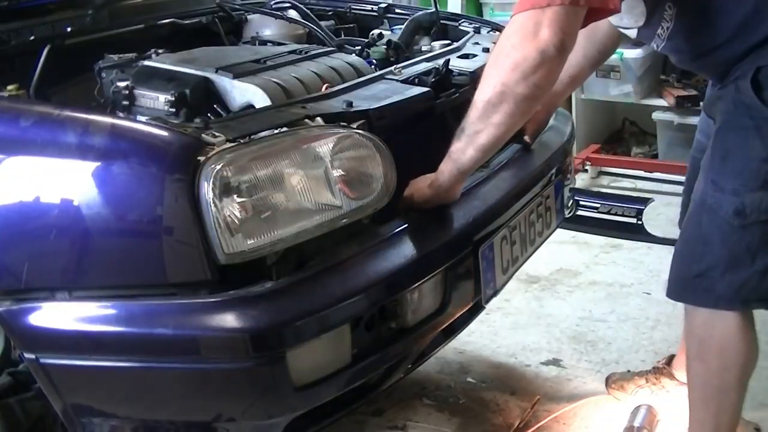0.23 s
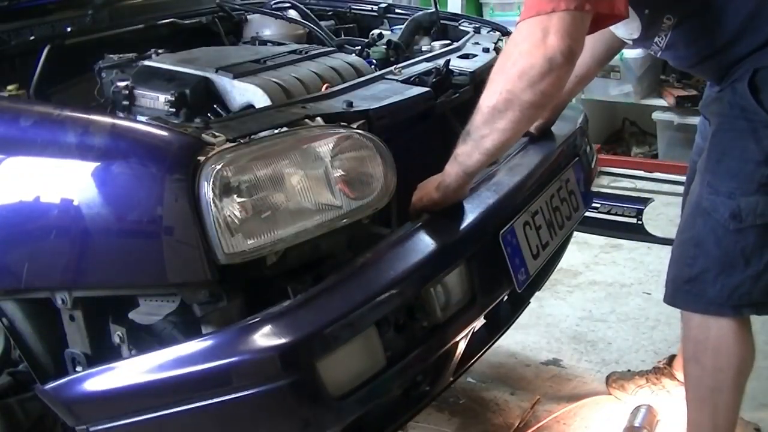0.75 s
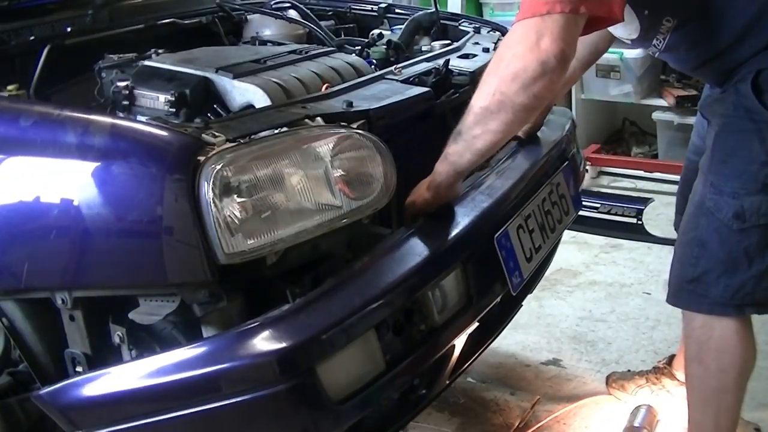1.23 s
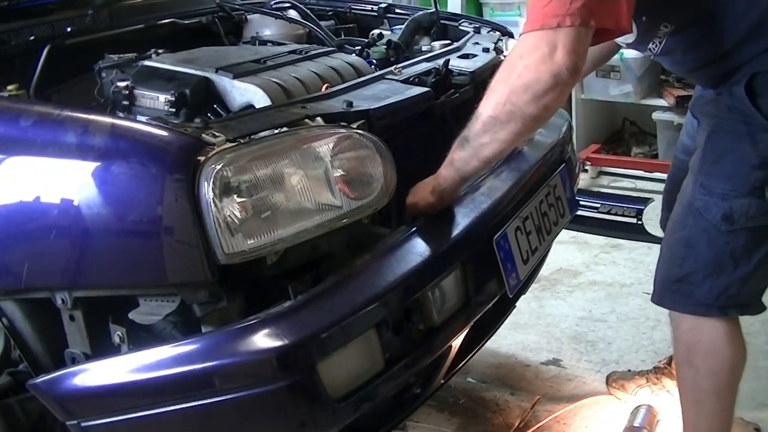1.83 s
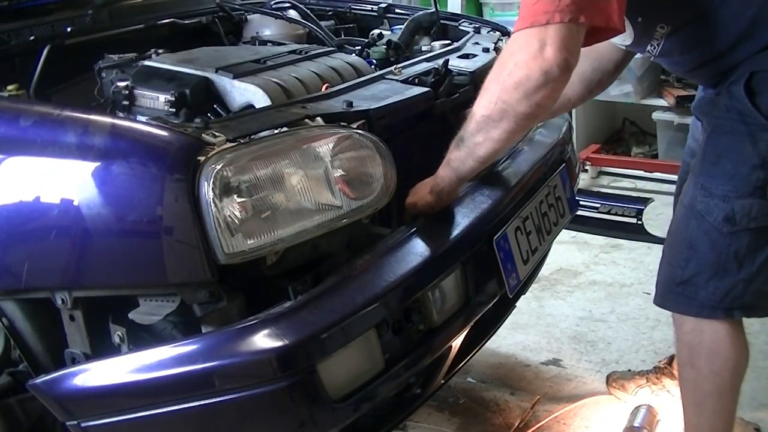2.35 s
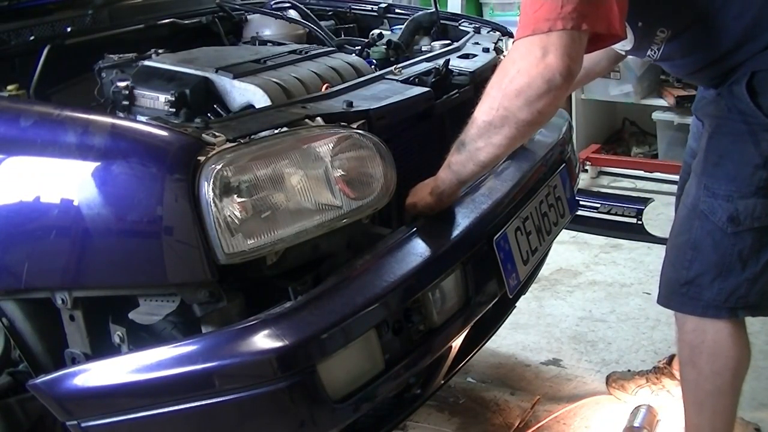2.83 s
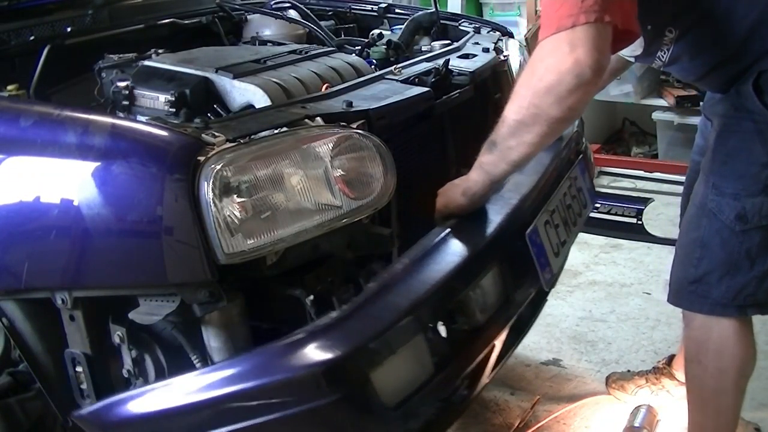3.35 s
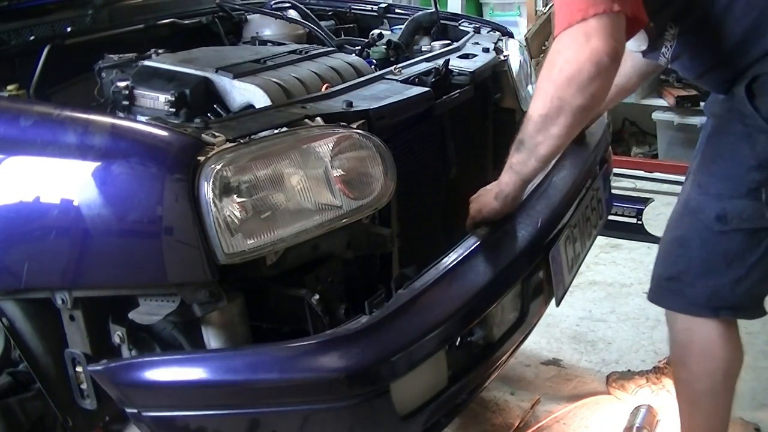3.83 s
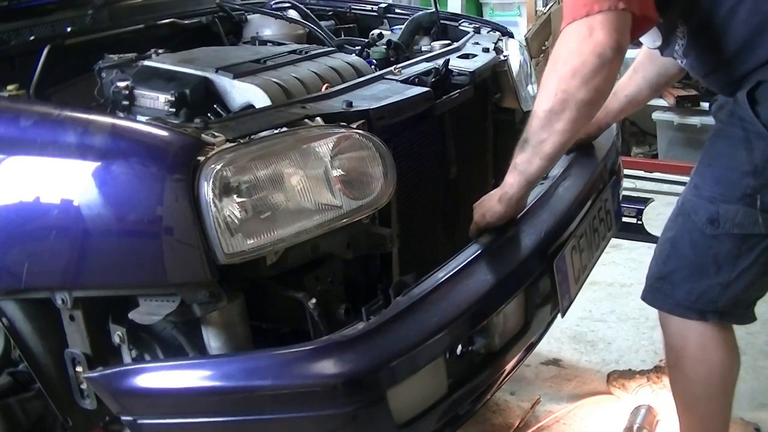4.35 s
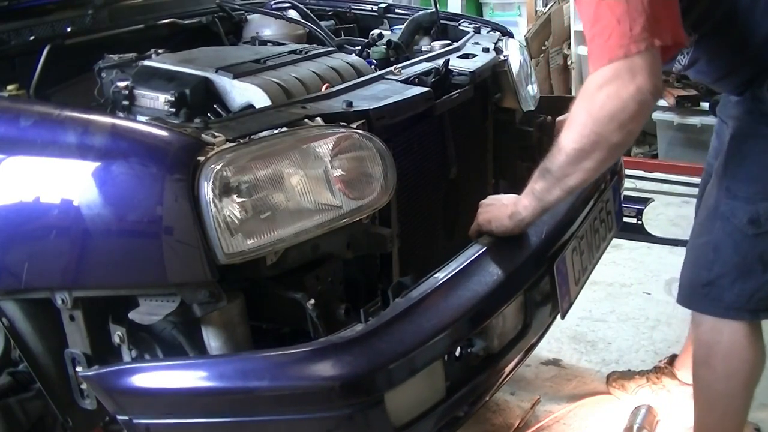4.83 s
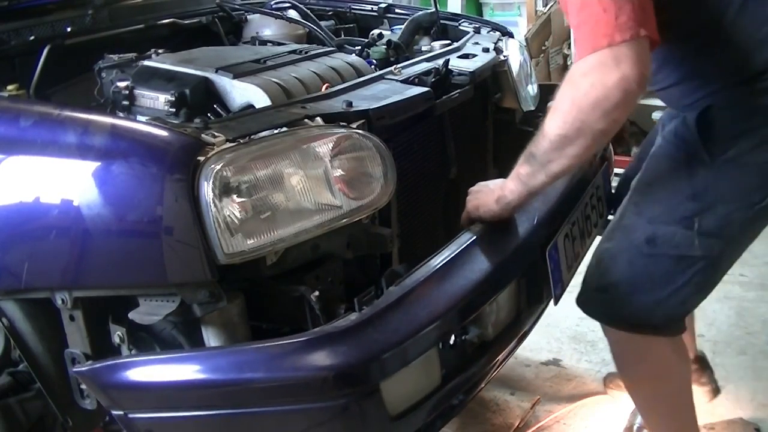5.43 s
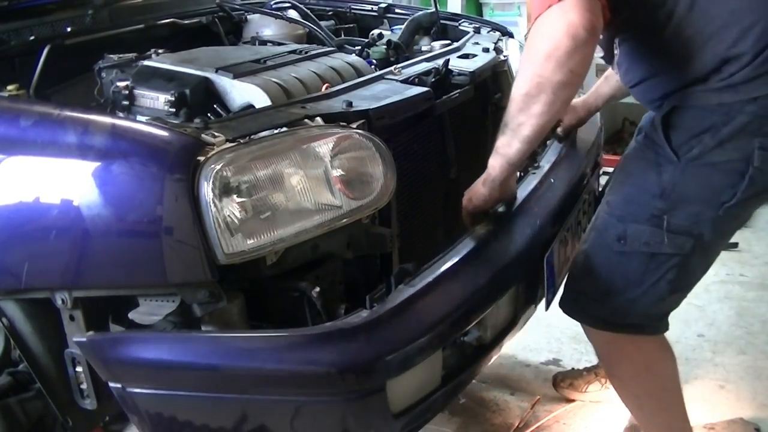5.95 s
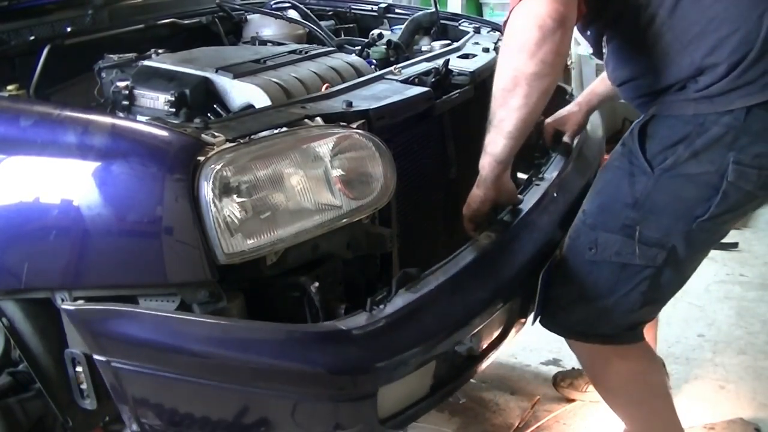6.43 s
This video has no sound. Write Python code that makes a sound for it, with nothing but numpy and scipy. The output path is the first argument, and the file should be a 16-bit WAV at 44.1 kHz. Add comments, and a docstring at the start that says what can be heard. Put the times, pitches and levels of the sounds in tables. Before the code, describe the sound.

Soft, steady air noise fills a garage with a short reverberation; the sound is close, hollow and doubled, nearly centred. A gritty shoe scuff opens at 0 s. From about 0.2 s a plastic bumper rubs dully along its guides, then cracks and knocks in irregular clusters, with a sharp crack near 0.55 s. The hardest snaps come around 1.1 and 1.5 s, with hollow booms, quick rebounds and deep thuds from the car body. A very faint scuff falls at 1.8 s. From 2.2 to 2.7 s rubbing is strong, a small metal fitting rings thinly, and brighter cracks and clip clicks follow. Lighter knocks continue from 3 s, with a crisp tick at 3.4 s and another cluster near 4 s. Then it is sparse: a bright tick at 4.8 s, small knocks around 5.6 s, brief soft rubs and ticks to 6.3 s, and a faint scuff near 6.4 s.

```python
"""In a garage, under steady air noise, a shoe scuffs the concrete (again, fainter, at 1.8 s and near the end).
A plastic front bumper is then pulled off its mounts by hand: it rubs along its guides from 0.2 s on,
and the shell cracks, knocks and booms, most densely up to about 4 s. Clips tick from 0.3 s to 6.3 s,
the car body thuds between 1 and 4 s, and a loose metal fitting rings thinly around 2.2 s.
Noise bursts, decaying modes and a room tail make it; the recorder doubles everything 3.8 ms apart: hollow."""
import sys
import numpy as np
from scipy import signal
from scipy.fft import rfft, irfft
from scipy.io import wavfile

SR = 44100
rng = np.random.default_rng(int(sys.argv[2]) if len(sys.argv) > 2 else 0)


def file_out(sig):
    """Save sig as 16-bit WAV at sys.argv[1]."""
    # one column per channel
    cols = np.atleast_2d(sig).T
    # limit, then scale
    lim = np.clip(cols, -1, 1)
    pcm = np.round(lim * 32767).astype(np.int16)
    wavfile.write(sys.argv[1], SR, pcm)


N = 295029
TIME = np.arange(N) / SR
AGE = TIME[:SR // 2]  # time since an event began, half a second
SHORT_AGE = AGE[:SR // 5]


def undb(db):
    """Decibels to amplitude."""
    return 10 ** (np.asarray(db) / 20)


def unit(x):
    """Scale to rms 1."""
    return x / np.sqrt(np.mean(x ** 2))


def blow(x, db):
    """Set the rms level of the first 20 ms."""
    return x * undb(db) / np.sqrt(np.mean(x[:SR // 50] ** 2))


def fade(t60):
    """Exponential decay that loses 60 dB in t60 seconds."""
    return np.exp(-np.log(1000) * AGE / t60)


def add(out, s, x):
    """Mix x in at time s."""
    i = int(s * SR)
    out[i:i + len(x)] += x[:N - i]


def colour(x, points):
    """Minimum-phase filter through (frequency [Hz], level [dB]) points."""
    hz, db = np.transpose(points)
    size = 4096
    bins = np.fft.rfftfreq(size, 1 / SR).clip(1)
    log_gain = np.log(undb(np.interp(np.log(bins), np.log(hz), db)))
    # folding the cepstrum onto positive times makes the filter causal
    cepstrum = irfft(log_gain)
    cepstrum[1:size // 2] *= 2
    cepstrum[size // 2 + 1:] = 0
    impulse = irfft(np.exp(rfft(cepstrum)))
    return signal.fftconvolve(x, impulse)[:len(x)]


def butter(x, hz, kind, order=2):
    """Butterworth filter, its edges kept below half the sample rate."""
    edges = np.minimum(hz, SR / 2 - 500)
    return signal.sosfilt(signal.butter(order, edges, kind, fs=SR, output="sos"), x)


def grit(size, spread_db):
    """Dense micro-contacts whose strength jumps every 32 samples."""
    strength = np.repeat(rng.standard_normal(size // 32 + 1), 32)[:size]
    return unit(rng.standard_normal(size) * undb(spread_db * strength))


def walk(rate):
    """Random wander, spread near 1, through `rate` straight-line knots per second."""
    knots = rng.standard_normal(4096)
    return np.interp(TIME * rate, np.arange(len(knots)), knots)


def strokes(rows, attack_s, release_s, sag_db_per_s=0):
    """Each stroke grips, eases off while it lasts (if a sag is given) and dies away."""
    out = np.zeros(N)
    age = TIME[:2 * SR]
    for s, length, db in rows:
        shape = np.minimum(age / attack_s, 1) * np.exp(-np.maximum(age - length, 0) / release_s)
        add(out, s, shape * undb(db - sag_db_per_s * age))
    return out


# spectrum of the garage air: (frequency [Hz], relative density [dB per Hz])
AIR = [(20, -19), (35, -21), (50, 1.5), (75, -15.5), (120, -7.5), (230, -6.5), (400, -5), (750, -4.5),
       (1100, -2.5), (2300, -7), (4500, -14), (8000, -21.5), (12000, -25), (16000, -30)]
AIR_DB = -54  # rms before the doubling


def background():
    """Steady garage air: coloured noise whose level wavers slightly."""
    air = unit(colour(rng.standard_normal(N), AIR))
    return air * undb(AIR_DB + 0.14 * walk(2))


# reverberation of the garage: (frequency [Hz], decay time t60 [s])
ROOM_T60 = [(150, 0.43), (400, 0.48), (1000, 0.25), (3000, 0.36), (8000, 0.26), (16000, 0.14)]


def garage(x, low_db=-3.5, high_db=-2.5, build_s=0.0032):
    """Diffuse tail of decaying noise in octave bands, weakest but longest in the low middle."""
    hz, t60 = np.transpose(ROOM_T60)
    tail = 0
    for centre in 125 * 2. ** np.arange(8):
        decay = fade(np.interp(np.log(centre), np.log(hz), t60))
        shape = decay * (1 - np.exp(-(AGE / build_s) ** 2))
        noise = butter(rng.standard_normal(len(AGE)), centre * np.sqrt([.5, 2]), "band", order=3)
        gain = undb(np.interp(centre, [400, 1800], [low_db, high_db]))
        tail = tail + noise * shape / np.sqrt(np.sum(shape ** 2)) * gain
    return signal.fftconvolve(x, tail)[:N]


# the car body takes the jolt: (time [s], level of the thud's peak [dB])
JOLTS = [(1.093, -41), (1.531, -38.5), (1.639, -53), (1.751, -54), (1.879, -53), (3.559, -58),
         (4.03, -57.5)]


def jolts(start_hz=86, end_hz=25, sag_s=0.069, swell_s=0.028, rumble_db=-9):
    """A deep, uneven thud gliding down in pitch: gliding sine plus low noise."""
    out = np.zeros(N)
    hz = end_hz + (start_hz - end_hz) * np.exp(-AGE / sag_s)
    swell = AGE / swell_s * np.exp(1 - AGE / swell_s)
    for s, db in JOLTS:
        thud = np.sin(2 * np.pi * np.cumsum(hz) / SR) * swell ** 2
        noise = butter(rng.standard_normal(len(AGE)), np.array([35, 85]), "band")
        rumble = unit(noise) * np.sqrt(swell)
        add(out, s, undb(db) * (thud + undb(rumble_db) * rumble))
    return out


# a loose metal fitting is tapped: (time [s], level [dB])
TAPS = [(2.189, -62), (2.231, -53.5), (2.291, -50)]
# its modes: (frequency [Hz], relative level [dB], decay time t60 [s])
FITTING = [(3970, -4, 0.15), (7170, -5, 0.17), (7160, -12, 0.17), (7520, -5, 0.14), (7900, -8, 0.2),
           (11600, -17, 0.13)]


def fitting():
    """A small metal part rings thinly as the bumper slides past it: a sum of decaying sines."""
    out = np.zeros(N)
    for s, db in TAPS:
        ring = 0
        for hz, gain_db, t60 in FITTING:
            strength = undb(gain_db + 2 * rng.standard_normal())  # differs at each tap
            ring = ring + strength * fade(t60) * np.sin(2 * np.pi * hz * AGE)
        add(out, s, blow(ring, db))
    return out


# clips and grit, levels before the trim clip_db:
# (time [s], level [dB], centre [Hz], decay time t60 [s], body relative to snap [dB])
TICKS = [(0.349, -43.5, 9100, 0.031, -18), (.585, -52, 11000, 0.037, -15), (1.008, -47.5, 9400, 0.024, -22),
         (1.085, -63, 13500, .03, -15), (1.446, -56, 11000, .04, -19), (2.397, -45.5, 9300, 0.023, 14.5),
         (2.554, -44.5, 10700, .066, -20), (3.366, -61, 11000, .015, -25), (3.425, -36, 8900, 0.015, -3),
         (3.68, -54, 11000, 0.023, -15), (4.009, -57, 14000, .04, -20), (4.319, -62, 9400, .01, -20),
         (4.393, -55.5, 8800, .0073, -24), (4.452, -49, 6160, 0.078, -23), (4.824, -40, 7900, 0.025, -4.5),
         (5.85, -48, 8700, .026, -12), (6.256, -58.5, 8440, 0.022, -16)]
CLIP_WIDTH, CLIP_BODY_RATIO = 1.42, 0.66  # band edge over centre; pitch of the body over that of the snap


def clips(clip_db=-3):
    """Small stiff parts snap as short bright noise, their body sounding about a fifth lower."""
    out = np.zeros(N)
    edges = np.array([1 / CLIP_WIDTH, CLIP_WIDTH])
    for s, db, hz, t60, body_db in TICKS:
        burst = rng.standard_normal(len(AGE)) * fade(t60)
        snap = butter(burst, hz * edges, "band")
        body = butter(burst, CLIP_BODY_RATIO * hz * edges, "band")
        add(out, s, blow(snap, db + clip_db))
        add(out, s, blow(body, db + clip_db + body_db))
    return out


# shoe on concrete, levels before the trim scuff_db: (time [s], length [s], level [dB])
SCUFFS = [(0, 0.039, -33.5), (1.79, .02, -52), (6.4, 0.063, -55.5)]
# colour of the sole: (frequency [Hz], relative level [dB])
SCUFF_COLOUR = [(120, -17), (200, -11), (305, -3.5), (409, -13), (538, -2), (950, -7.5), (3250, 1),
                (3690, -4.5), (9400, -5), (16000, -18)]


def scuffing(scuff_db=-2):
    """A sole drags over gritty concrete: uneven micro-contacts in brief strokes."""
    sole = unit(colour(grit(N, spread_db=4.5), SCUFF_COLOUR))
    return undb(scuff_db) * sole * strokes(SCUFFS, attack_s=0.0027, release_s=0.029)


# each pull slides the plastic along its guides, levels before the trim slide_db:
# (time [s], length [s], level at the start [dB])
PULLS = [(.17, 0.35, -42), (.55, 1, -46.5), (1.55, 0.19, -39.5), (2.24, 0.51, -37), (2.84, 0.52, -42.5),
         (3.45, 0.3, -46), (3.89, 0.18, -41.5), (4.39, 0.037, -58), (5.43, .05, -54.5), (5.76, 0.054, -51),
         (5.96, 0.1, -48.5), (6.25, 0.074, -49.5), (6.44, 0.07, -52)]
# colour of the rubbing: (frequency [Hz], relative level [dB])
SLIDE_COLOUR = [(100, -14.5), (190, -7), (280, -0.5), (380, -1.5), (550, -6), (1000, -10), (2000, -16.5),
                (4000, -29), (8000, -29.5), (16000, -40)]


def rubbing(slide_db=-5):
    """The shell sticks and slips along its guides: micro-contacts of wandering strength."""
    slips = grit(N, spread_db=4) * undb(2.5 * walk(60))
    pulls = strokes(PULLS, attack_s=0.032, release_s=0.048, sag_db_per_s=10)
    return undb(slide_db) * unit(colour(slips, SLIDE_COLOUR)) * pulls


def contact(x, hz, q):
    """Low-pass at the contact corner with hardly any resonance: the contact responds up to its own pitch and
    passes little above it."""
    w = 2 * np.tan(np.pi * hz / SR)
    return signal.lfilter(*signal.bilinear([w * w], [1, w / q, w * w]), x)


# colour of the cracks: (frequency [Hz], relative level [dB])
CRACK_COLOUR = [(100, -53.5), (400, -4.5), (800, -.5), (1300, 4), (2400, -2), (4000, -3.5), (7000, -2),
                (11000, -2.5), (16000, -9)]
CRUNCH_DB = 4  # scatter in the strength of the micro-contacts within a crack


def chatter(rise, corner_hz, db, crack_t60=0.1, contact_q=0.72):
    """A crack is a fresh, decaying burst of micro-contacts heard through the contact."""
    burst = grit(len(rise), CRUNCH_DB) * rise * fade(crack_t60)[:len(rise)]
    return blow(contact(colour(burst, CRACK_COLOUR), corner_hz, contact_q), db)


# modes of the shell: (frequency [Hz], relative level [dB], decay time t60 [s])
SHELL = [(149, 2.5, 0.13), (167.6, -3, 0.54), (227, -2, 0.18), (258, 3, 0.084), (289.2, 0, 0.13),
         (313.6, -2, 0.12), (379, 7.5, 0.15), (419, 8, 0.22), (503.7, -1.5, 0.12), (498, 13, 0.017),
         (576.5, 0.5, 0.14), (641, 3, 0.11), (754, 11, 0.079), (825, 5.5, 0.16), (930, 14, 0.09),
         (1030, -37, 0.16), (1116, -14, 0.11), (1282, -2, 0.17), (1461, 7, 0.092), (1659, -4.5, 0.17),
         (1932, 1.5, 0.13), (2103, 5, 0.087), (2346, 0, 0.038), (2590, 5.5, 0.029), (2946, -2, 0.045)]


def shell(centre_hz, octaves, arrive_s, others, detune=0.0295):
    """The place of a blow favours the modes near one pitch; bending detunes them a little."""
    hz, db, t60 = np.transpose(SHELL)[:, :, None]
    nearness = np.exp(-.5 * (np.log2(hz / centre_hz) / octaves) ** 2)
    weight = undb(db) * (others + nearness)
    hz = hz * (1 + detune * rng.standard_normal(hz.shape))
    # the modes fall roughly into step as the bending wave arrives
    phase = rng.uniform(0, 2 * np.pi) + 0.6 * rng.standard_normal(hz.shape)
    decay = np.exp(np.float32(-np.log(1000) * SHORT_AGE / t60))
    swing = np.sin(np.float32(2 * np.pi * hz * (SHORT_AGE - arrive_s) + phase))
    return np.sum(weight * decay * swing, axis=0)


# the shell catches and lets go, levels before the trims flex_db, knock_db and crack_db:
# (time [s], rise [ms], flexing [dB], knock [Hz], knock [dB], crack [dB], crack corner [Hz])
KNOCKS = [ (.298, 6.5, -46, 465, -42, -39.5, 2770), (.328, 10, -41, 535, -40, -40, 1810),
          (.348, 0.63, -32, 680, -38, -35, 4540), (.483, 2.7, -69, 547, -46, -40, 1500),
          (.508, 3, -45, 510, -39, -45.5, 2400), (.548, 0.14, -49, 605, -34.5, -25.5, 1600),
          (.584, 1.1, -36, 610, -58, -45.5, 7000), (.657, 0.25, -54, 580, -35.5, -45, 990),
          (.866, 0.87, -40.5, 584, -41, -53, 1300), (.942, 1.2, -51, 620, -43.5, -50, 1400),
          (1.005, 0.87, -35.5, 650, -43, -26, 1690), (1.079, 0.55, -25.5, 500, -31.5, -22.5, 2800),
          (1.086, 0.55, -27.5, 2650, -24, -28.5, 3470), (1.142, 3.8, -46, 520, -32.5, -34, 2400),
          (1.209, 2, -39, 590, -39, -50.5, 1500), (1.419, 3.9, -37.5, 1630, -45, -54, 1510),
          (1.434, 12, -30, 500, -33, -34, 2270), (1.518, 3.5, -27, 2680, -27, -25.5, 3400),
          (1.551, 1.7, -42, 530, -31.5, -35, 1940), (1.613, 3.9, -28, 570, -32, -38, 2200),
          (1.636, 0.81, -35, 550, -30, -31, 1940), (1.855, 2, -45.5, 596, -38, -45, 1070),
          (2.179, 1.8, -27, 677, -28.5, -32.5, 1290), (2.234, 5.3, -48, 730, -39.5, -37.5, 2790),
          (2.291, 4.3, -52, 730, -40.5, -36.5, 3770), (2.379, 1.8, -62, 815, -41, -36.5, 3500),
          (2.394, 1.3, -47, 800, -35.5, -27, 4700), (2.523, 13, -39, 1530, -31, -26.5, 2370),
          (2.554, 1.2, -46, 624, -64, -37, 6900), (2.691, 4.2, -51, 885, -38.5, -30, 4900),
          (2.943, .9, -63, 945, -58, -44.5, 2510), (3.058, 20, -37, 510, -46.5, -45.5, 5740),
          (3.191, 3.1, -60, 630, -41.5, -47, 6140), (3.237, 6, -48, 550, -42, -50, 2400),
          (3.551, 7.7, -31.5, 560, -46, -46, 1900), (3.6, 2.2, -55, 390, -37, -46, 4730),
          (3.995, 11, -69, 580, -35, -40.5, 1490), (4.018, 3.3, -51, 960, -32, -41.5, 1880),
          (4.028, 0.53, -51, 620, -34.5, -30.5, 2050), (4.147, 5.8, -59, 577, -40.5, -54.5, 1800),
          (5.579, 2.9, -46, 1650, -35.5, -42, 2720), (5.603, 2.2, -61, 1740, -40, -42.5, 2010),
          (5.719, 2.7, -52.5, 736, -74, -68, 2000), (5.851, 1, -72, 2200, -56, -55.5, 2600)]
# a crack of FULL_DB has force 1; the harder the crack, the later and higher the shell's boom
FULL_DB, SPRING_S, STIFFEN_HZ = -23, .028, 22
# the boom sinks in pitch as the bumper leaves its mounts
HELD_HZ, FREE_HZ, FREE_AT_S = 289.6, 258.5, 2.1
# two rebounds follow each blow: mean gap, level of the first, change at the second
REBOUND_S, REBOUND_DB, REBOUND_LOSS_DB = .04, -15.5, -5.5


def bumper(flex_db=-.5, knock_db=0.8, crack_db=0, flex_lag_s=0.0074, rebound_ring_db=-8):
    """Each catch cracks and knocks the shell, which booms and rebounds; one row per place along it."""
    places = np.zeros((5, N))
    swell = 1 - np.exp(-SHORT_AGE / flex_lag_s)  # the heavy flexing builds up last
    for k, (s, rise_ms, flex, knock_hz, knock, crack, corner_hz) in enumerate(KNOCKS):
        place = places[k % len(places)]  # blows take the places in turn
        force = undb(crack - FULL_DB)
        rise = 1 - np.exp(-SHORT_AGE * 1000 / rise_ms)
        flex_hz = np.interp(s, [0, FREE_AT_S], [HELD_HZ, FREE_HZ]) + STIFFEN_HZ * force
        flexing = rise * swell * shell(flex_hz, octaves=0.092, arrive_s=0.00601, others=0.059)
        boom = blow(flexing, flex + flex_db)
        knocking = rise * shell(knock_hz, octaves=0.2, arrive_s=0.00299, others=0.095)
        ring = blow(knocking, knock + knock_db)
        add(place, s, ring + chatter(rise, corner_hz, crack + crack_db))
        add(place, s + SPRING_S * force, boom)
        delays = np.cumsum(REBOUND_S * (.5 + rng.random(size=2)))
        for n, delay in enumerate(delays):
            rebound = undb(rebound_ring_db) * ring + chatter(rise, corner_hz, crack + crack_db)
            add(place, s + delay, undb(REBOUND_DB + n * REBOUND_LOSS_DB) * rebound)
    return places


# how much the two sides differ: (frequency [Hz], level [dB])
WIDTH = [(30, -19), (70, -5), (130, -7), (280, -27), (550, -26), (1100, -24), (2200, -17.5), (4500, -16),
         (8500, -13), (10500, -12), (16000, -36)]


def scene():
    """Every place has its own paths through the room; the sides differ only a little."""
    small_parts = clips() + fitting() + scuffing() + rubbing()
    sources = [*bumper(), small_parts]
    mid = sum(x + garage(x) for x in sources) + jolts() + background()
    side = colour(garage(sum(sources)) + background(), WIDTH)
    return np.array([mid + side, mid - side])


DOUBLE_S, DOUBLE_GAIN, DOUBLE_TOP_HZ = .003771, .68, 8900  # lead, gain and treble limit of the early copy
TOP_HZ = 16700


def record(dry):
    """The recorder adds a duller, weaker copy just ahead, combing all but the top treble, and cuts the top."""
    hz = np.fft.rfftfreq(2 * N, 1 / SR)
    early = DOUBLE_GAIN / (1 + (hz / DOUBLE_TOP_HZ) ** 16)
    late = np.exp(-2j * np.pi * hz * DOUBLE_S)
    hollow = irfft(rfft(dry, 2 * N) * (early + late))[:, :N]
    return signal.sosfilt(signal.ellip(8, .2, 70, TOP_HZ, fs=SR, output="sos"), hollow)


dry = scene()
out = record(dry)
file_out(out)
```